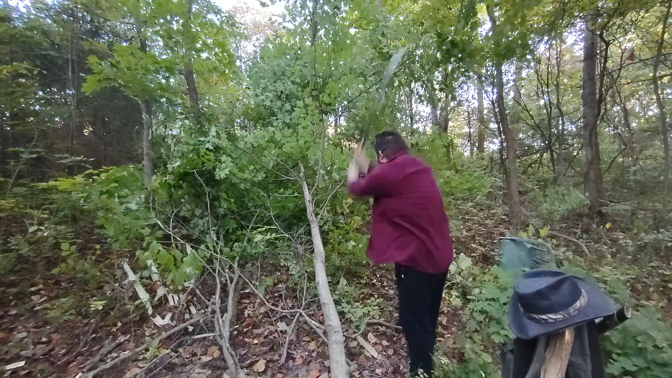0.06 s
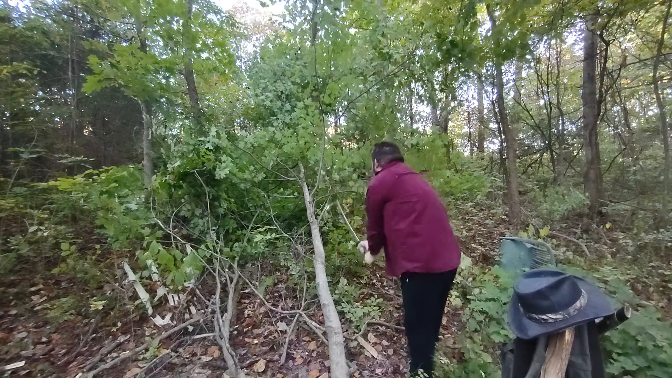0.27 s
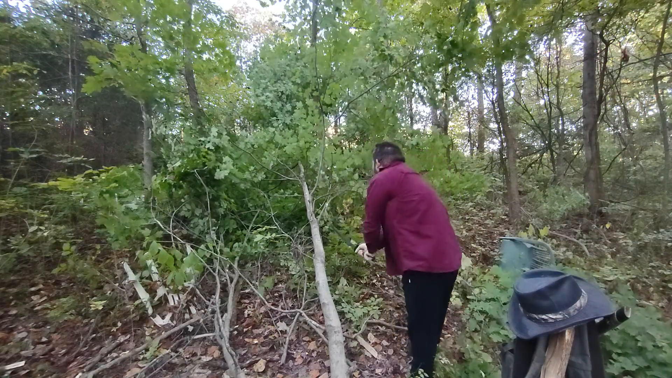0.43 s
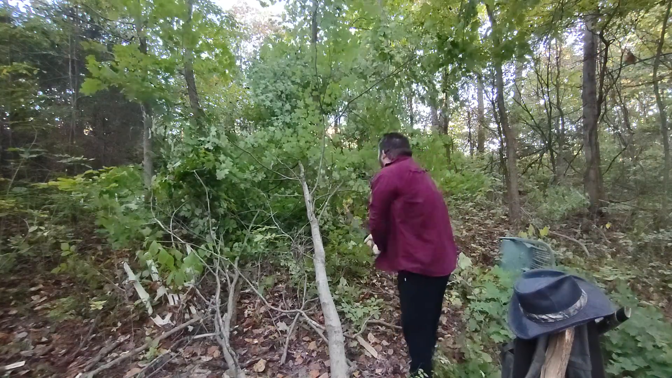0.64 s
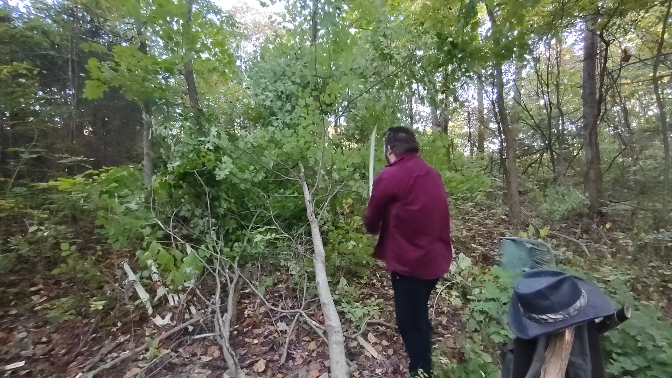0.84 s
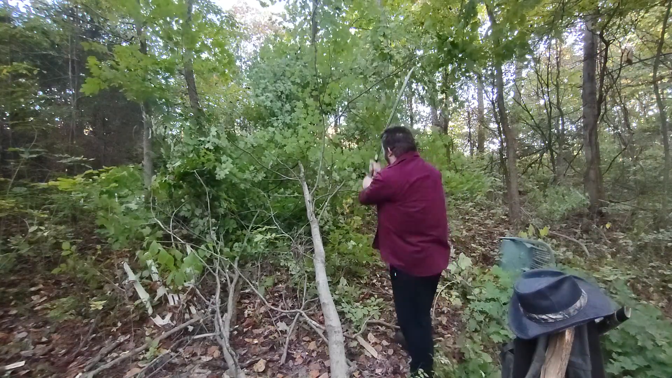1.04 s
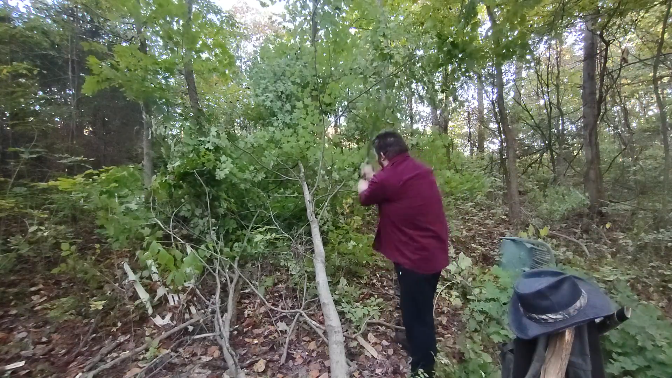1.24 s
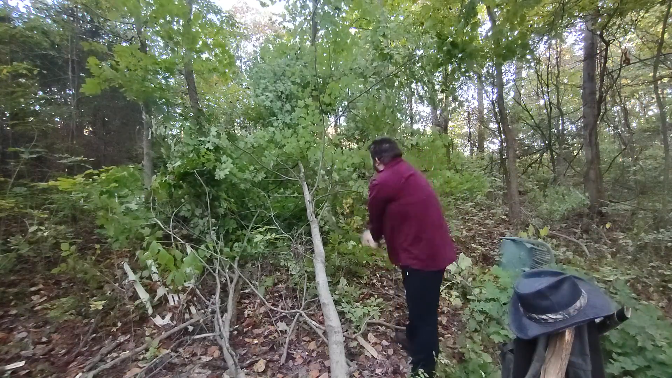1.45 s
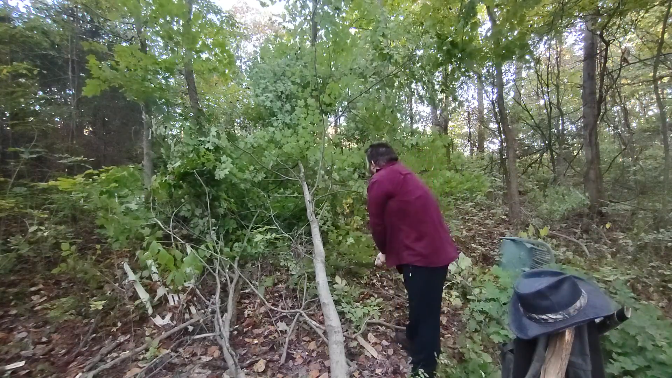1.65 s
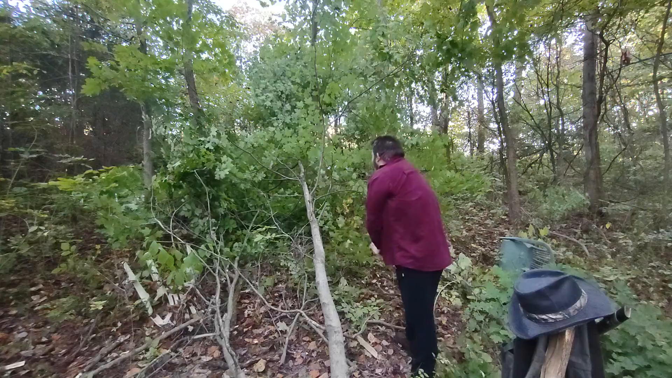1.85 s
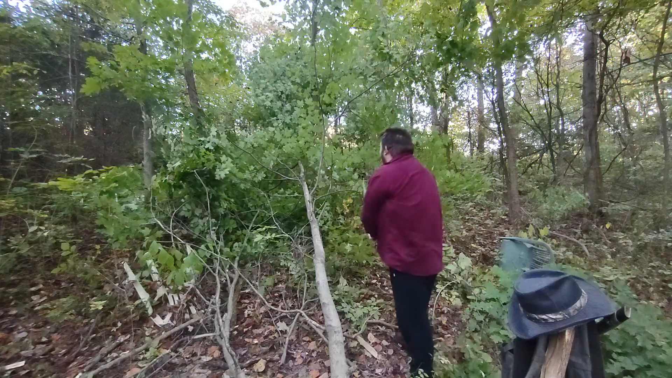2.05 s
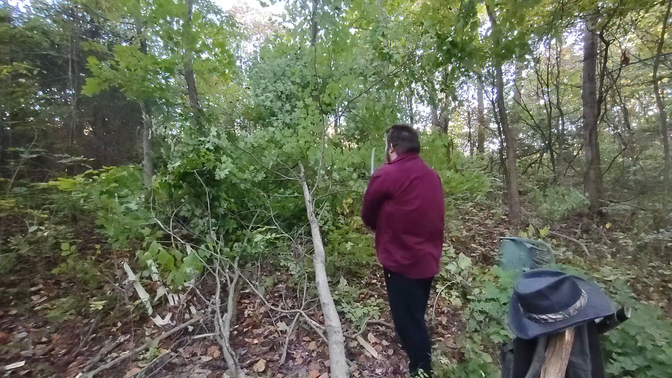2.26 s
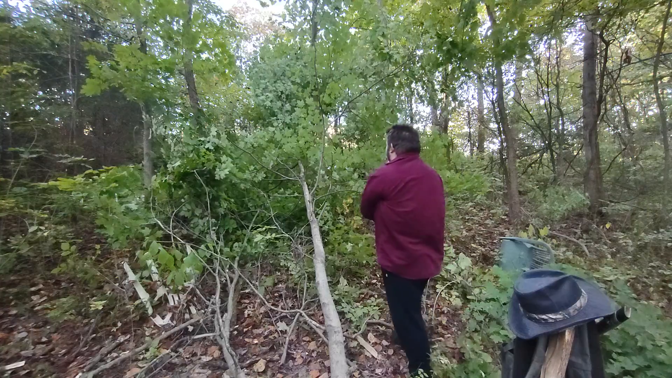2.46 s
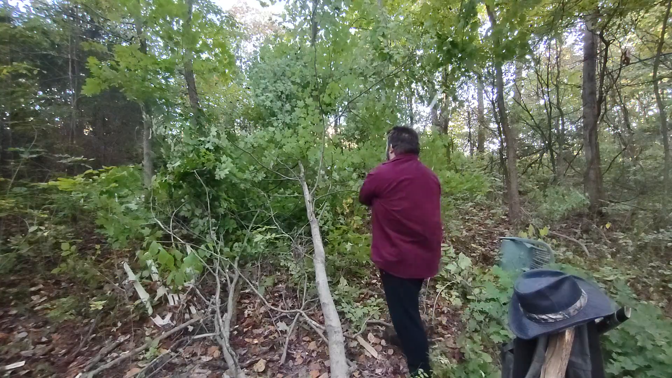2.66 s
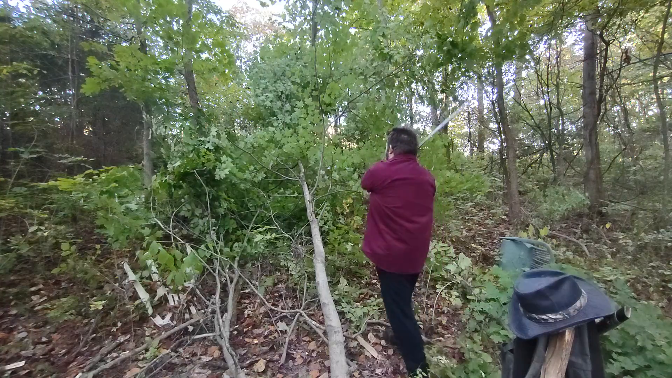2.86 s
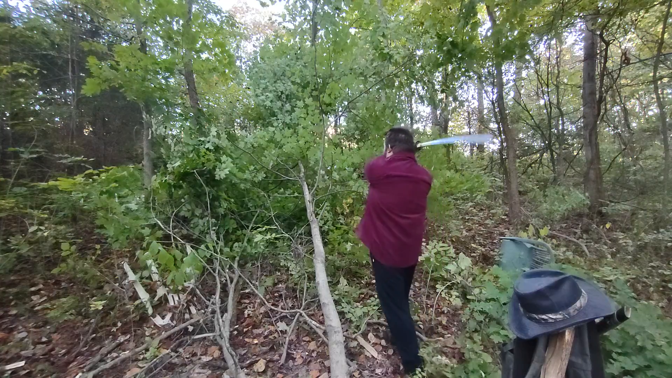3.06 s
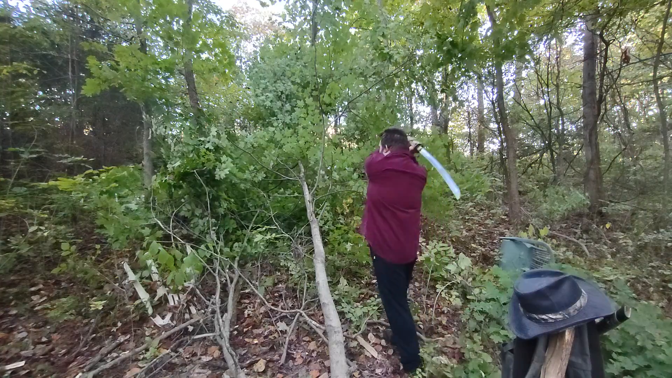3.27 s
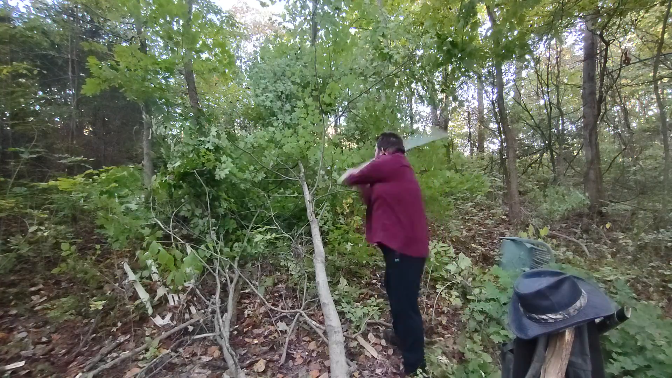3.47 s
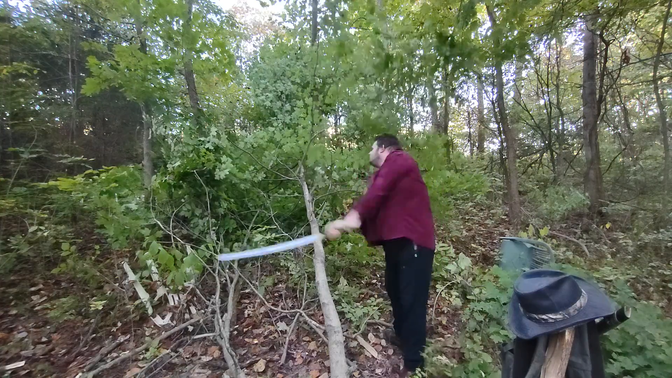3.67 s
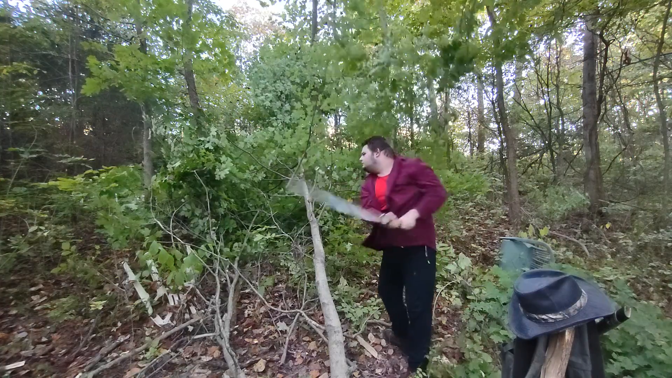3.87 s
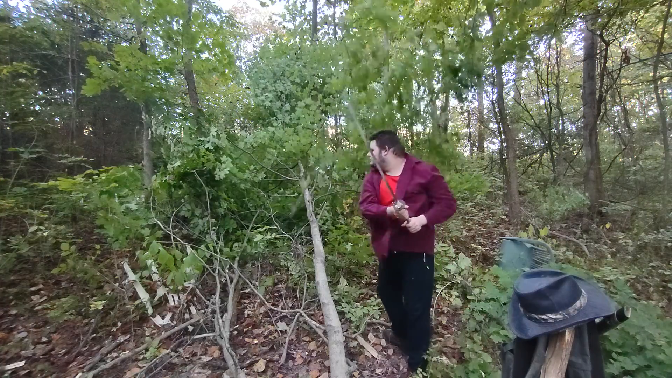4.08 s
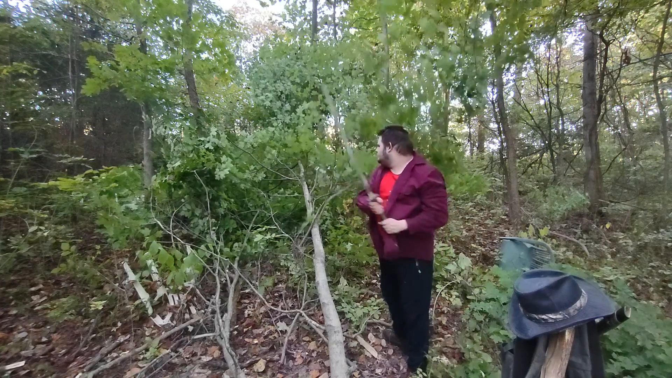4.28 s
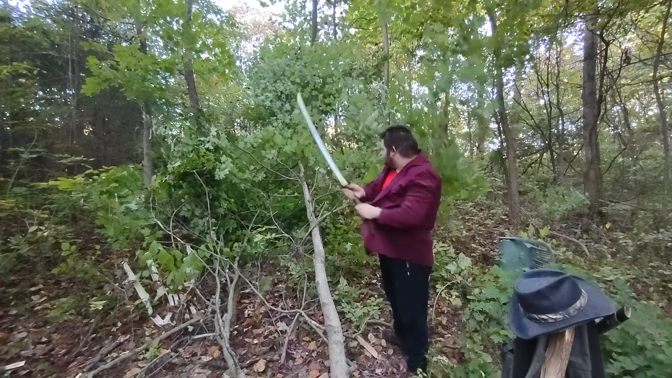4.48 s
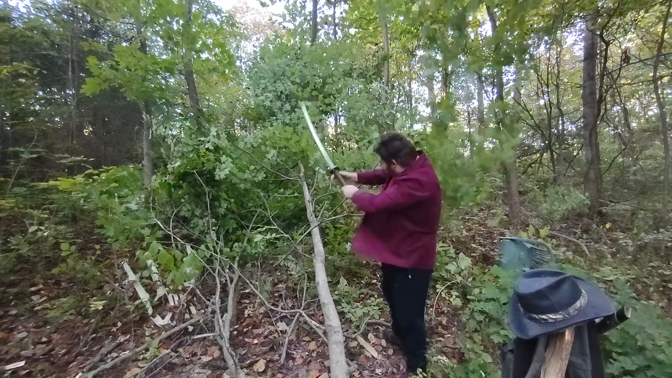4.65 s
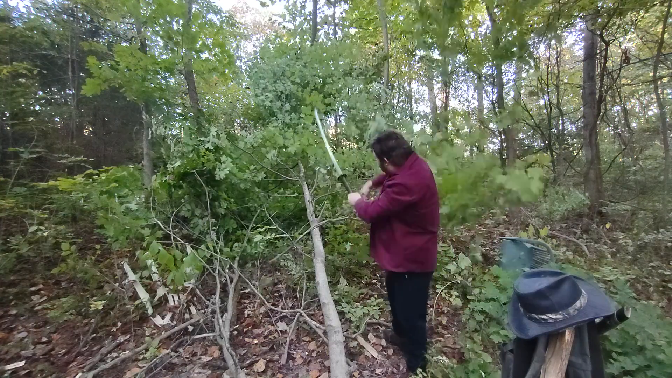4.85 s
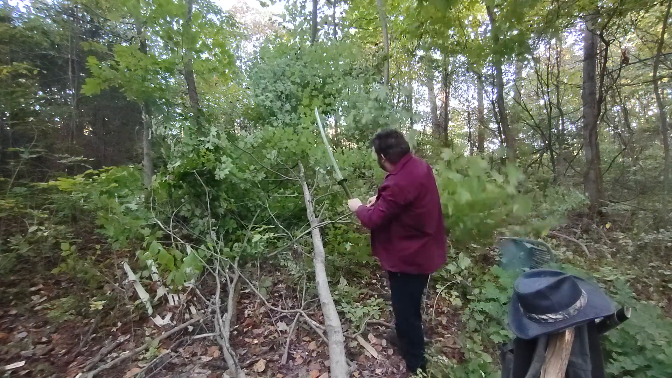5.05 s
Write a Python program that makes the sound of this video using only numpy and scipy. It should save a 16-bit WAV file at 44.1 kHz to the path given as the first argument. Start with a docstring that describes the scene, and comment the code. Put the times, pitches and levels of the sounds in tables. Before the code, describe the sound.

A long blade chops three times into green saplings in a wood, with shaking leaves, snapping twigs and a treetop crashing softly down.

```python
"""A long steel blade chops three times into green saplings in a wood. At each chop, fibres tear,
the stem knocks and the steel rings briefly; the first and last swings swish and squeak.
Shaken leaves hiss, twigs and chips tick, and trunks and foliage scatter each chop into echoes.
The last sapling topples through the bushes and its cut end thuds on the ground.
Behind it all are the faint whistles of a far bird and a low rumble."""
import sys
import numpy as np
from scipy import signal
from scipy.fft import rfft, irfft, next_fast_len
from scipy.io import wavfile
from scipy.ndimage import map_coordinates

SR = 44100
rng = np.random.default_rng(int(sys.argv[2]) if len(sys.argv) > 2 else 0)


def log_audio(samples):
    """Write samples as a 16-bit WAV file to the path given in sys.argv[1]."""
    # one column per channel
    frames = np.atleast_2d(samples).T
    # limit to full scale, then quantise
    limited = np.clip(frames, -1, 1)
    pcm = np.round(limited * 32767).astype(np.int16)
    wavfile.write(sys.argv[1], SR, pcm)


N = 225563
TOP_HZ = 15950
OPPOSITE = np.array([[1], [-1]])  # pushes left and right opposite ways


def amp(db):
    """Turn decibels into a gain."""
    return 10 ** (np.asarray(db) / 20)


def unit(x):
    """Scale a sound to an average (rms) level of 1."""
    return x / np.sqrt(np.mean(x ** 2) + 1e-20)


def along(points, hz):
    """Read between (pitch_hz, value) points, spaced by octaves."""
    pitches, values = np.transpose(points)
    return np.interp(np.log(hz + 1), np.log(pitches), values)


def since(start_s):
    """Seconds gone by since start_s, zero before it."""
    return np.maximum(np.arange(N) / SR - start_s, 0)


def wobble(rate, size=N):
    """A smooth random curve through `rate` points a second."""
    return map_coordinates(rng.standard_normal(4096), [np.arange(size) * rate / SR], mode="wrap")


def burst(t, rise_s, hold_s, fade_s):
    """A level that rises, holds and dies away. Every fade_s is the time to drop 60 dB."""
    return (1 - np.exp(-t / rise_s)) * np.exp(-np.log(1000) * np.maximum(t - hold_s, 0) / fade_s)


def filtered(x, response):
    """Give each frequency in x the gain response(hz)."""
    size = x.shape[-1]
    padded = next_fast_len(size + 4096)
    return irfft(rfft(x, padded) * response(np.fft.rfftfreq(padded, 1 / SR)), padded)[..., :size]


def add(track, start_s, sound):
    """Mix a sound into a track at start_s."""
    part = track[..., max(round(start_s * SR), 0):][..., :sound.shape[-1]]
    part += sound[..., :part.shape[-1]]


def fuzzy_tone(hz, width_hz, size):
    """A narrow band of noise around a pitch, which may glide."""
    phase = 2 * np.pi * np.cumsum(hz * np.ones(size)) / SR
    return unit(wobble(width_hz, size) * np.sin(phase) + wobble(width_hz, size) * np.cos(phase))


# How alike left and right are (1 = the same) for near and for scattered sounds: pitch_hz, likeness
NEAR = [(100, 0.96), (800, 0.93), (3500, 0.41), (6000, 0.72), (9000, 0)]
SCATTERED = [(100, 1), (600, 0.5), (1500, 0.28), (3000, .1), (8000, 0)]
def noise(spectrum, likeness, size=N, spiky_db=0, tilt_db=0):
    """Stereo noise shaped by a spectrum; spiky_db makes it grainy, tilt_db (per octave) brighter."""
    grains = amp(spiky_db * np.repeat(rng.standard_normal(size // 16 + 1), 16)[:size])
    def response(hz):
        colour = amp(along(spectrum, hz) + tilt_db * np.log2(np.maximum(hz, 500) / 4000))
        spread = np.arccos(np.clip(along(likeness, hz), -1, 1)) / 2
        return colour * [np.cos(spread), np.sin(spread)]
    mid, side = filtered(grains * rng.standard_normal((2, size)), response)
    return unit(np.array([mid + side, mid - side]))


# How the rumble rises and falls: time_s, relative_db
RUMBLE_LEVELS = [(0.0, -83), (0.38, -79.5), (1.48, -70), (3.43, -79), (4.47, -69), (5.11, -73)]
# How alike its left and right are: pitch_hz, likeness
RUMBLE_LIKENESS = [(80, 0.77), (130, 0.16), (300, .6)]
# The tone of the rumble and of the hush: pitch_hz, relative_db
RUMBLE_SPECTRUM = [(20, -33), (50, -19), (70, -10), (85, 5), (102, -12), (127, 2), (165, -21.5),
                   (300, -24.5), (800, -61)]
HUSH_SPECTRUM = [(30, -15.5), (150, -2.5), (400, -0.5), (1000, -4.5), (2500, -7), (3200, -2), (4000, -9),
                 (5000, -10), (9500, -14), (11500, -22), (15500, -17)]
def background():
    """A distant low rumble swells and sinks under the hush of the wood."""
    rumble_db = 2 + np.interp(since(0), *np.transpose(RUMBLE_LEVELS))
    rumble = amp(rumble_db) * noise(RUMBLE_SPECTRUM, RUMBLE_LIKENESS)
    return rumble + amp(-72.5) * noise(HUSH_SPECTRUM, SCATTERED)


# The bird's calls: start_s, end_s, first_hz, last_hz, level_db
WHISTLES = [(1.387, 1.611, 3370, 3260, -70), (2.887, 3.131, 3350, 3260, -69),
            (3.039, 3.356, 3270, 3216, -73), (3.35, 3.578, 1372, 1320, -73.5)]
def bird():
    """Thin, slightly falling whistles from far off, blurred by many paths through the trees."""
    out = np.zeros((2, N))
    for start_s, end_s, first_hz, last_hz, level_db in WHISTLES:
        progress = np.linspace(0, 1, round((end_s - start_s) * SR))
        pitch_hz = first_hz + (last_hz - first_hz) * progress
        whistle = np.array([fuzzy_tone(pitch_hz, width_hz=120, size=len(progress)) for _ in range(2)])
        add(out, start_s, amp(level_db) * np.sin(np.pi * progress) * whistle)
    return out


# The tone of the echoes: pitch_hz, relative_db
ECHO_SPECTRUM = [(80, -3), (200, -2), (320, -3), (500, -5), (900, -13.5), (1600, -7.5), (3000, -7.5),
                 (6000, -6), (10000, -3), (15000, -0.5)]
# How long near and far trees echo: pitch_hz, fade_s
NEAR_TREES = [(100, 0.28), (1000, 0.15), (4000, 0.28), (10000, .34), (15000, 0.05)]
FAR_TREES = [(100, 2), (1000, 2.1), (4000, 1.1), (10000, 0.39), (15000, 0.28)]
def tree_echoes(sound, fades, build_s):
    """Echoes from trunks and foliage build up, then die at a speed that depends on pitch."""
    hiss = noise([(20, 0), (20000, 0)], SCATTERED, SR)
    hz, t, bands = signal.stft(hiss, SR, nperseg=256)
    envelope = burst(t, build_s, 0, along(fades, hz)[:, None])
    tail = signal.istft(bands * envelope, SR, nperseg=256)[1]
    tail = filtered(tail / np.linalg.norm(tail[0]), lambda hz: amp(along(ECHO_SPECTRUM, hz)))
    return signal.fftconvolve(sound, tail, axes=1)[:, :N]


def crackle(spectrum, rate):
    """Stalks and dry leaves tick at random, about `rate` times a second, some loud and some soft."""
    ticks = (rng.random(N) < rate / SR) * amp(np.minimum(4 * rng.standard_normal(N), 3))
    tick_shape = burst(np.arange(SR // 32) / SR, 0.0003, 0.001, 0.014)
    return signal.fftconvolve(ticks, tick_shape)[:N] * noise(spectrum, NEAR)


# The tone of scraping branches: pitch_hz, relative_db
BRANCH_SPECTRUM = [(40, -31), (85, -8.5), (130, 1.5), (230, -3.5), (450, -2.5), (650, -1), (1000, 0.5),
                   (1800, -0.5), (2600, -5), (6000, -35)]
def rustle(power, leaf_spectrum):
    """Leaves flick past each other in clumps while branches scrape and tick."""
    leaf_gain, branch_gain = np.sqrt(power)
    clumps = wobble(90)
    leaves = amp(1.8 * clumps) * noise(leaf_spectrum, SCATTERED, spiky_db=1.5)
    leaves += amp(-0.5) * crackle(leaf_spectrum, rate=26)
    branches = amp(0.86 * clumps) * noise(BRANCH_SPECTRUM, SCATTERED, spiky_db=3.5)
    branches += amp(0.5) * crackle(BRANCH_SPECTRUM, rate=28)
    return leaf_gain * leaves + branch_gain * branches


def swells(rows, depth_db=22):
    """Leaf and branch power of movements that climb depth_db in rise_s and sink as far in fall_s."""
    t, power = since(0), np.zeros((2, N))
    for peak_s, leaf_db, branch_db, rise_s, fall_s in rows:
        from_peak = np.maximum((peak_s - t) / rise_s, (t - peak_s) / fall_s)
        power += (amp([[leaf_db], [branch_db]]) * amp(-depth_db * from_peak)) ** 2
    return power


# The tone of hissing leaves: pitch_hz, relative_db
LEAF_SPECTRUM = [(600, -34), (1500, -10), (2300, -1.5), (3500, 2), (5500, -0.5), (7200, -2.5), (10000, -4),
                 (11800, -11.5), (15500, -6.5)]
# The undergrowth stirs between swings: peak_s, leaf_db, branch_db, rise_s, fall_s
STIRS = [(0.02, -65, -69.5, 0.14, 0.27), (1.13, -59, -64.5, 0.21, 0.14), (2.02, -56.5, -67, 0.19, 0.071),
         (2.34, -66.5, -83, 0.1, .3), (2.715, -58.5, -65, 0.26, 0.1), (2.94, -70.5, -78.5, 0.26, 0.086),
         (3.095, -64, -70.5, .04, 0.08), (3.40, -68, -92, 0.11, 0.16)]
# A blow or a dropping branch shakes the leaves: start_s, leaf_db, branch_db, hold_s, fade_s, quiver_db
SHAKES = [(0.36, -43, -50.5, 0.049, 0.28, -57), (1.633, -33.5, -44, .022, 0.39, -68.5),
          (1.786, -36.5, -49, 0.033, 0.21, -68.5), (3.702, -37.5, -47.5, 0.043, 0.51, -64)]
def foliage():
    """Each shake sets the foliage thrashing; thin twigs quiver on with little scrape."""
    resting = amp([[-78], [-84]])  # leaves, branches
    power = swells(STIRS) + resting ** 2
    for start_s, leaf_db, branch_db, hold_s, fade_s, quiver_db in SHAKES:
        t = since(start_s)
        thrash = amp([[leaf_db], [branch_db]]) * burst(t, 0.009, hold_s, fade_s)
        quiver = amp([[quiver_db], [quiver_db - 12.5]]) * burst(t, 0.009, hold_s, fade_s=1.7)
        power += thrash ** 2 + quiver ** 2
    return rustle(power, LEAF_SPECTRUM)


# The tone of the treetop's crashing leaves: pitch_hz, relative_db
TREETOP_SPECTRUM = [(600, -13.5), (1500, -16), (2300, -0.5), (3500, 4), (5500, 0), (7200, -6.5), (8500, 2),
                    (10000, -0.5), (11800, -5.5), (15500, -1)]
# It hits one bush after another: peak_s, leaf_db, branch_db, rise_s, fall_s
CRASHES = [(4.30, -47, -49, 0.085, 0.34), (4.465, -45, -48.5, 0.13, 0.26), (4.555, -42.5, -49, 0.28, 0.093),
           (4.605, -46, -57.5, .04, 0.12), (4.675, -46.5, -55, 0.12, 0.2), (4.85, -51.5, -60, 0.14, 0.093),
           (5.02, -48.5, -58, 0.16, .12), (5.11, -49.5, -53, 0.024, 0.11)]
def falling_treetop():
    """The cut top leans over with a soft, growing rustle and crashes brightly through the bushes."""
    t = since(3.74)
    rise_s, growth_db_per_s = 0.33, 2
    slide = np.minimum(t / rise_s, 1) * amp(growth_db_per_s * t) * amp([[-58], [-63]])  # leaves, branches
    return rustle(slide ** 2, LEAF_SPECTRUM) + rustle(swells(CRASHES), TREETOP_SPECTRUM)


# The tone of wood hitting the ground: pitch_hz, relative_db
GROUND_KNOCK_SPECTRUM = [(60, -25), (250, -14.5), (420, -3.5), (650, 3.5), (950, -1.5), (1400, -21),
                         (4000, -32), (12000, -64.5)]
# Blows through the roots or from the falling cut end: start_s, thump_db, pitch_hz, fade_s, knock_db
THUDS = [(0.342, -38.5, 91.7, 0.2, -53), (1.567, -36.5, 83.6, 0.16, -57), (1.62, -40.5, 105, 0.044, -60),
         (1.805, -66, 140, 0.19, -57), (3.686, -49.5, 102.8, 0.54, -70), (4.3858, -40, 117, 0.044, -37),
         (4.437, -48, 118, 0.076, -44), (4.621, -43.5, 136.4, 0.074, -53)]
def ground_thuds():
    """A woody knock, then the soft forest floor thumps."""
    out, t = np.zeros((2, N)), np.arange(SR // 2) / SR
    for start_s, thump_db, pitch_hz, fade_s, knock_db in THUDS:
        phase = 2 * np.pi * pitch_hz * t + 0.6 * wobble(85, len(t))  # loose soil holds no steady pitch
        apart = (pitch_hz / 140) ** 2 * OPPOSITE  # left and right differ more for higher thumps
        knock = noise(GROUND_KNOCK_SPECTRUM, NEAR, len(t))
        add(out, start_s, amp(thump_db) * burst(t, 0.006, 0.014, fade_s) * np.sin(phase + apart))
        add(out, start_s, amp(knock_db) * burst(t, 0.00082, 0.0018, 0.081) * knock)
    return out


def falling_bits(count):
    """Each shake drops chips and twig ends that tick on the way down: start_s, level_db, pitch_hz."""
    rows = []
    for start_s, leaf_db, *_ in SHAKES:
        for size, pitch in rng.standard_normal((count, 2)):
            drop_s = rng.uniform(0.14, 0.44)
            rows.append((start_s + drop_s, leaf_db - 21 + 2 * size, 3200 * np.exp(0.2 * pitch)))
    return rows


# Twigs and splinters snap: start_s, level_db, pitch_hz
SNAPS = [(0.2288, -57.5, 7760), (1.4917, -58, 6070), (1.591, -29, 3210), (1.6282, -17.5, 3960),
         (1.6942, -32.5, 5720), (1.7851, -38.5, 6000), (1.803, -29, 3700), (1.8484, -34, 5620),
         (1.9772, -43, 3280), (2.0917, -45, 4410), (2.2026, -53.5, 3490), (2.4017, -47.5, 2426),
         (2.4709, -58, 3240), (2.8797, -48.5, 5270), (3.217, -58, 2520), (4.315, -36, 1590),
         (4.517, -39, 2520), (4.617, -38.5, 3230)]
def twigs():
    """Twigs break with a brief crack, higher the thinner they are; each has a few dull tones."""
    out, t = np.zeros((2, N)), np.arange(SR // 16) / SR
    for start_s, level_db, hz in SNAPS + falling_bits(count=5):
        spectrum = [(hz / 8, -11), (hz / 2, -2.75), (hz, 0), (hz * 2, -8), (hz * 8, -32)]
        crack = noise(spectrum, NEAR, len(t), spiky_db=1.5)
        tones_hz = np.minimum(hz * np.exp(0.35 * rng.standard_normal((8, 1))), TOP_HZ)
        ring = unit(np.sin(2 * np.pi * (tones_hz * t + rng.random((8, 1)))).sum(axis=0))
        add(out, start_s, amp(level_db) * burst(t, 0.0005, 0.0007, 0.021) * crack)
        add(out, start_s, amp(level_db - 5) * burst(t, 0.0005, 0.0007, 0.019) * ring)
    return out


# Swings of the blade: start_s, end_s, first_hz, last_hz, full_speed_db
SWINGS = [(0.209, 0.35, 337.3, 789, -64.5), (3.608, 3.672, 649, 913, -53.5)]
def swishes():
    """Air swirls off the blade, rising in pitch and level as it gathers speed."""
    out = np.zeros(N)
    for start_s, end_s, first_hz, last_hz, full_speed_db in SWINGS:
        speed = np.linspace(0, 1, round((end_s - start_s) * SR))
        swish = fuzzy_tone(first_hz + (last_hz - first_hz) * speed, width_hz=280, size=len(speed))
        add(out, start_s, amp(full_speed_db) * speed * swish)
    return out


# The flat of the blade rubs in the wet cut: start_s, pitch_hz, level_db, hold_s
SQUEAKS = [(0.3365, 4240, -28.5, 0.0035), (0.36, 4360, -28.5, 0.0067), (0.388, 5770, -38, 0.013),
           (0.415, 4570, -39.5, 0.01), (3.679, 4240, -29, 0.013)]
def squeaks():
    """Steel sticks and slips on sappy wood: a brief, rough squeal."""
    out, t = np.zeros(N), np.arange(SR // 8) / SR
    for start_s, pitch_hz, level_db, hold_s in SQUEAKS:
        squeal = fuzzy_tone(pitch_hz, width_hz=900, size=len(t))
        add(out, start_s, amp(level_db) * burst(t, 0.001, hold_s, 0.04) * squeal)
    return out


# The tones each sapling and the cut top make as they bend: pitch_hz, relative_db, fade_s
FIRST_STEM = [(312, -19.5, 0.32), (384.6, -11.5, .12), (629, -4, 0.088), (913, 0.5, 0.054),
              (1280, -10, 0.017), (1800, -8, 0.012)]
SECOND_STEM = [(404, -6.5, 0.029), (633, -10, 0.05), (803, 3, .035), (947, -1, 0.061)]
THIRD_STEM = [(333, -22.5, 0.28), (372, -16, 0.11), (668, -12.5, 0.14), (789, 0.5, 0.072),
              (1121, -5, 0.061), (1347, -6, 0.044), (1997, 4, 0.014)]
CUT_TOP = [(447, -3.5, .055), (607, 1.5, 0.018), (850, -3, 0.025)]
# A stem is cut, gives way or lands: start_s, level_db, fade_share, tones
KNOCKS = [(0.3389, -16.5, 0.71, FIRST_STEM), (0.360, -28.5, 0.96, FIRST_STEM),
          (1.559, -31.5, .9, SECOND_STEM), (1.587, -30, .9, SECOND_STEM), (1.619, -28.5, .2, SECOND_STEM),
          (1.626, -29.5, 0.82, SECOND_STEM), (3.678, -18.5, 0.9, THIRD_STEM), (4.386, -28.5, 0.57, CUT_TOP)]
def stem_knocks():
    """Wet wood gives a short, rough knock; a wedged blade cuts its ring shorter."""
    out, t = np.zeros((2, N)), np.arange(SR // 4) / SR
    for start_s, level_db, fade_share, tones in KNOCKS:
        for pitch_hz, relative_db, fade_s in tones:
            phase = 2 * np.pi * pitch_hz * t + 0.35 * wobble(150, len(t))
            apart = 0.2 * wobble(120, len(t)) * OPPOSITE  # left and right are slightly out of step
            envelope = burst(t, 0.0023, 0.0024, fade_share * fade_s)
            add(out, start_s, amp(level_db + relative_db) * envelope * np.sin(phase + apart))
    return out


# The tone of tearing fibres: pitch_hz, relative_db
FIBRE_SPECTRUM = [(40, -32), (220, -13), (380, -7), (510, -7), (900, 2), (1500, -5), (2400, -2),
                  (3400, 4.5), (4400, -1.5), (6000, 0), (8000, -6), (10300, -8.5), (11800, -15.5),
                  (15500, -12)]
# The edge bites into wood: start_s, tear_db, hold_s, fade_s, tilt_db_per_octave, steel_db
CUTS = [(0.3407, -22.5, 0.0063, 0.06, -1, -39.5), (0.352, -28.5, 0.015, 0.16, 7, -43),
        (0.414, -39, 0.006, 0.04, 5.5, -48), (1.561, -25.5, 0.0043, 0.06, 0, -39.5),
        (1.576, -27, 0.022, 0.086, 1, -38), (1.625, -21, 0.0091, 0.021, 3, -17.5),
        (3.681, -22, 0.0085, 0.022, -2, -23.5), (3.7, -28.5, 0.016, 0.029, 5, -47)]
def tearing_fibres():
    """Fibres snap in a dense run, bundle by bundle, while the edge is in the wood."""
    out, t = np.zeros((2, N)), np.arange(SR // 4) / SR
    for start_s, tear_db, hold_s, fade_s, tilt_db, _ in CUTS:
        snaps = noise(FIBRE_SPECTRUM, NEAR, len(t), tilt_db=tilt_db)
        bundles = amp(1.2 * wobble(250, len(t)))
        add(out, start_s, amp(tear_db) * burst(t, 0.00084, hold_s, fade_s) * bundles * snaps)
    return out


# The blade's tones, muffled by wood and hands: pitch_hz, relative_db, fade_s
STEEL_TONES = [(3180, -1.5, 0.12), (3255, -9, 0.09), (3720, -14, 0.03), (4200, -12.5, 0.17),
               (5500, -12, 0.23), (5560, -15.5, 0.095), (5850, -11, 0.086), (6130, -16.5, .08),
               (8320, -17.5, 0.14), (10250, -17, 0.09)]
def blade_ring():
    """Each cut sets the steel ringing, and the rubbing wood jostles every tone."""
    out, t = np.zeros((2, N)), np.arange(SR // 4) / SR
    for start_s, _, hold_s, _, _, steel_db in CUTS:
        for pitch_hz, relative_db, fade_s in STEEL_TONES:
            phase = 2 * np.pi * (pitch_hz * t + rng.random()) + 0.7 * wobble(260, len(t))
            apart = (pitch_hz / 5000) ** 2 * rng.standard_normal() * OPPOSITE / 2
            envelope = burst(t, 0.0012, hold_s, fade_s)
            add(out, start_s, amp(steel_db + relative_db) * envelope * np.sin(phase + apart))
    return out


def place_right(sound):
    """The work is a little to the right, where the treble is stronger and arrives first."""
    lean = [(200, 0.35), (1000, 0.1), (3500, 0.75), (6500, 2.5), (9500, 2.5), (13000, -0.5)]  # hz, db
    delay_s = 13e-6 * OPPOSITE  # left late, right early
    return filtered(sound, lambda hz: amp(-OPPOSITE * along(lean, hz)) * np.exp(-2j * np.pi * hz * delay_s))


def scene():
    """Mix the chops, their echoes and the leaves with the bird and the rumble."""
    cracks = tearing_fibres() + twigs()
    knocks = blade_ring() + stem_knocks() + squeaks() + swishes() + ground_thuds()
    near_echoes = amp(-1.5) * tree_echoes(cracks + amp(-5.5) * knocks, NEAR_TREES, build_s=0.001)
    far_echoes = amp(-17) * tree_echoes(cracks, FAR_TREES, build_s=0.043)  # cracks carry furthest
    work = cracks + knocks + near_echoes + far_echoes + foliage() + falling_treetop()
    return place_right(work) + bird() + background()


def record(dry):
    """Round off the highest peaks, thin out the deep bass and cut the treble above TOP_HZ."""
    rounded = dry / (1 + (dry / 0.46) ** 4) ** (1 / 4)
    thinned = signal.sosfilt(signal.butter(2, 42, "high", fs=SR, output="sos"), rounded)
    return filtered(thinned, lambda hz: np.clip((TOP_HZ - hz) / 200 + 0.5, 0, 1))


dry = scene()
out = record(dry)
log_audio(out)
```